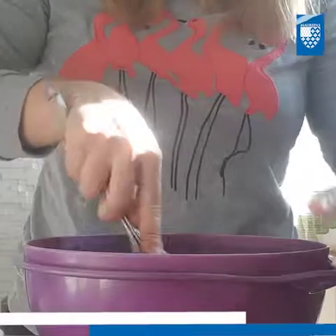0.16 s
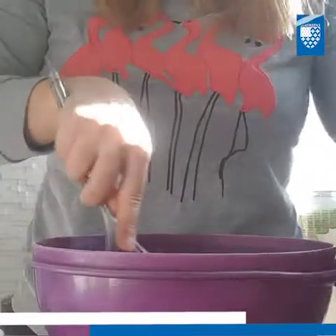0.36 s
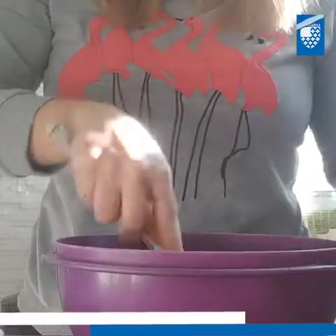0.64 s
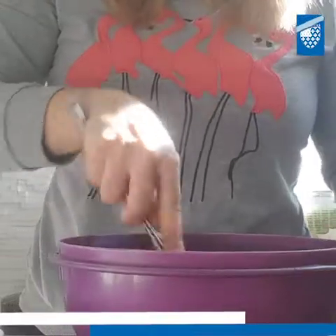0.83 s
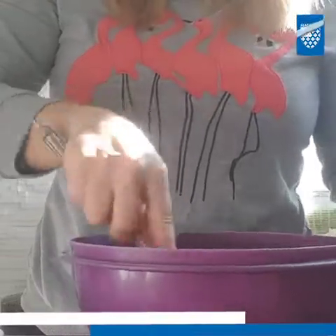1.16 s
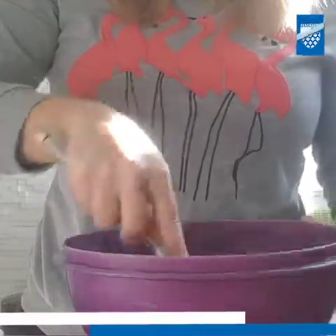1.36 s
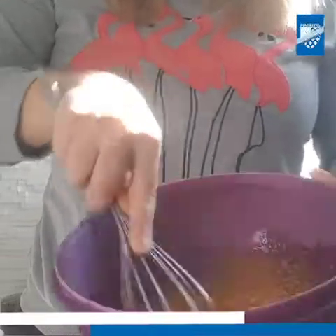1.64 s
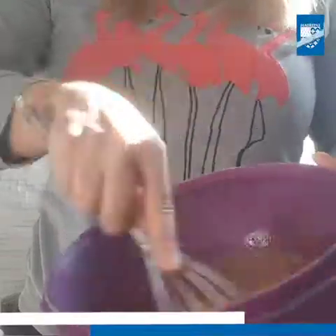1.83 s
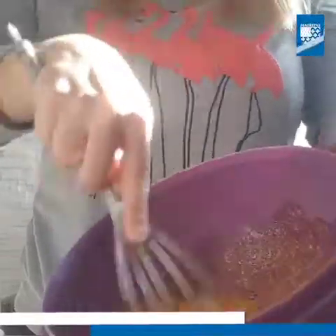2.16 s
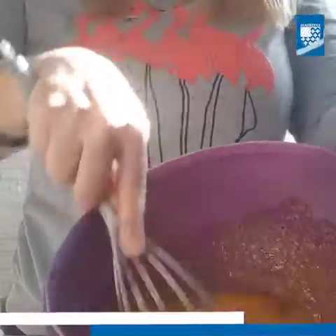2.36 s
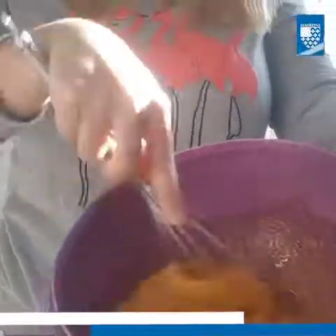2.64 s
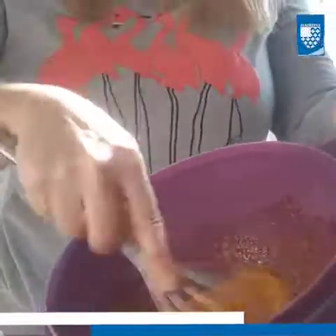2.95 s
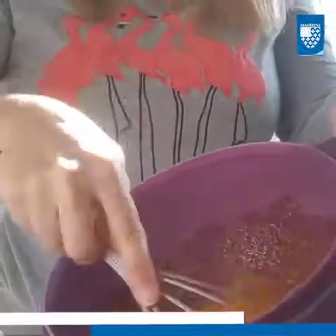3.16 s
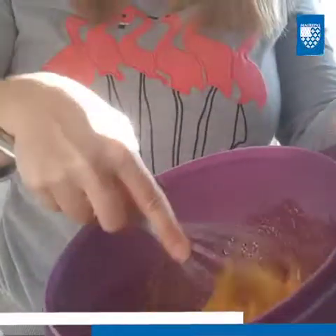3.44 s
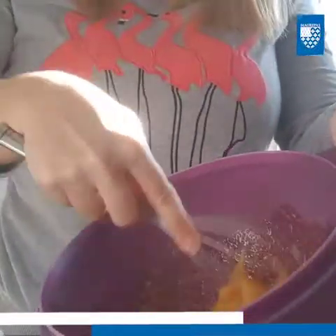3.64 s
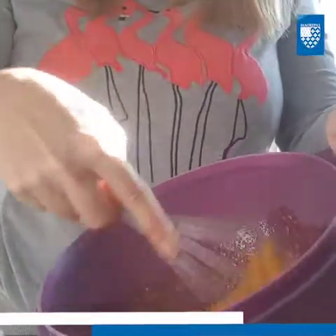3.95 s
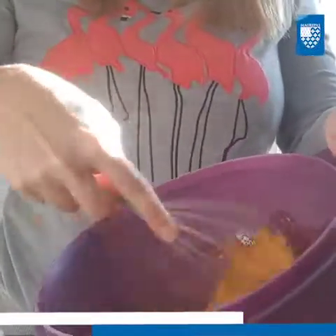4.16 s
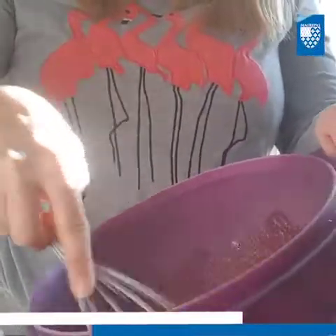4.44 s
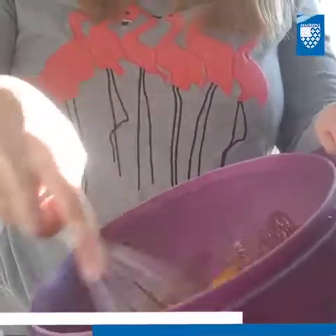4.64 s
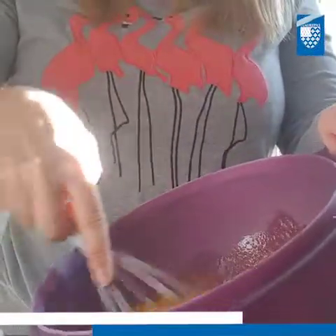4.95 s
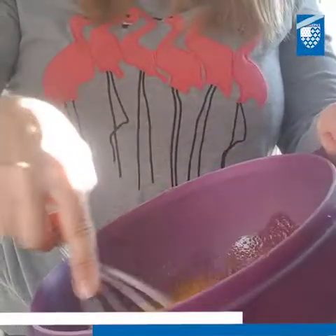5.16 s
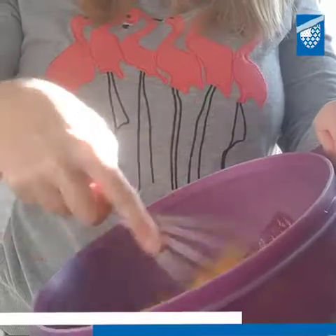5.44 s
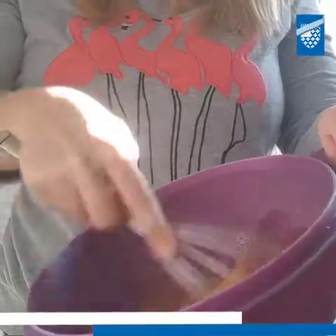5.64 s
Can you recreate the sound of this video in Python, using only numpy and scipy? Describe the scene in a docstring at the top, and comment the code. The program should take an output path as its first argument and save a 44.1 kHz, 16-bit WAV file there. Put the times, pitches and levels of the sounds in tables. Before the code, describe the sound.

Close up, a wire whisk works beaten egg in a plastic bowl in a quiet kitchen. Light, uneven strokes tick and scrape; around one second the bowl gets a dull bump with a brief wire twang. After three seconds the beating turns harder and regular, about four and a half strokes a second, with hollow clacks, wet slaps and frothy crackle. Short room reflections.

```python
"""A wire whisk beats eggs in a plastic bowl, about four and a half strokes a second, in a kitchen.
Each stroke is two bursts of wire ticks, a clatter on the wall and a scrape through the film, coloured by the bowl.
Slapped air pockets are damped gliding tones; froth is short rings set off by the whisk's power.
Bright rasps sound on bare plastic. The bowl thuds once near 1 s; about two seconds later the beating grows harder.
Filtered noise makes the rumble of the flexing bowl and the quiet room; sparse reflections make the reverberation."""
import sys
import numpy as np
from scipy import signal
from scipy.fft import rfft, irfft
from scipy.io import wavfile
from scipy.ndimage import uniform_filter1d

SR = 44100
rng = np.random.default_rng(int(sys.argv[2]) if len(sys.argv) > 2 else 0)


def materialize(psi):
    """Save the field psi as 16-bit PCM at rate SR to the path in sys.argv[1].

    A 1-D psi becomes a single channel; in a 2-D psi each row is a channel.
    """
    bounded = np.clip(np.atleast_2d(psi).T, -1, 1)
    quanta = np.round(bounded * 32767).astype(np.int16)
    wavfile.write(sys.argv[1], SR, quanta)


N = 255777

# Quiet room noise: (frequency [Hz], relative level [dB])
QUIET_SPECTRUM = [(25, -65), (55, -65), (200, -36.5), (2000, -45.5), (8000, -60.5)]
# Kitchen reverberation: (frequency [Hz], t60 [s])
KITCHEN_DECAY = [(100, 0.13), (2000, 0.36), (15000, 0.29)]
# Balance of the two microphone ports: (frequency [Hz], left minus right [dB])
PORT_BALANCE = [(120, -1), (450, 2), (1500, -2.5), (4500, 1.5), (9000, 0.5), (13000, -5.5)]
# Rumble of the flexing plastic: (frequency [Hz], relative level [dB])
FLEX_SPECTRUM = [(28, 0), (54, 6.5), (160, -2.5), (210, -21), (600, -32.5)]
# Nominal resonances of the bowl with the whisk in it: (frequency [Hz], width [Hz], lift [dB])
BOWL_RESONANCES = [(332, 117, 12), (562, 108, 10.5), (703, 102, 8.5), (1116, 46, 12.5), (1247.4, 49, 11.5),
                   (1646, 345, 6), (2200, 23, 0.5)]
# Modes of the whole bowl when bumped: (frequency [Hz], relative level [dB], t60 [s])
BODY_MODES = [(159, -4.5, 0.051), (309, 0, 0.1), (465, -12, 0.075), (669, -6.5, 0.17)]
# Crack of the bump: (frequency [Hz], relative level [dB])
CRACK_SPECTRUM = [(700, -2), (4500, -5.5), (9000, -28)]
# Shudder of the bowl after the bump: (frequency [Hz], relative level [dB])
SHUDDER_SPECTRUM = [(60, -1), (165, 27), (260, 2), (800, -5), (1300, -20), (5000, -35)]
# Air pockets slapped into the egg: (time [s], level [dB], starting pitch [Hz])
AIR_POCKETS = [ (1.052, -9.5, 672), (1.869, -31, 605), (2.101, -29.5, 613), (2.208, -18, 544),
               (3.428, -11, 507), (3.593, -14.5, 573), (4.038, -9.5, 578), (4.151, -24.5, 650),
               (4.225, -6, 596), (4.267, -13, 561), (4.453, -14, 590), (4.506, -18, 635),
               (4.761, -24.5, 634), (4.89, -20, 660), (4.914, -19, 603), (5.607, -14, 530)]
# Wires on bare plastic: (time of hardest pressure [s], relative level [dB], half length [s], treble [dB])
BARE_RASPS = [ (.532, -39.5, 0.0088, -5), (.927, -26.5, 0.032, -3.5), (1.296, -28.5, 0.012, -4),
              (1.355, -32, 0.04, 0.5), (2.54, -21, 0.0089, 5.5), (4.703, -25.5, 0.018, 4),
              (5.008, -24, 0.018, -2.5), (5.686, -22.5, 0.017, -6.5)]
# Rasp on bare plastic: (frequency [Hz], relative level [dB])
RASP_SPECTRUM = [(300, -12), (900, -9), (1800, 4.5), (7000, 3), (14000, -7.5)]
# Scrape through the wet film: (frequency [Hz], relative level [dB])
SCRAPE_SPECTRUM = [(220, -2.5), (500, 0), (900, -3.5), (1700, 3.5), (3800, 3), (7000, -2), (9000, -8.5),
                   (14000, -9)]
# Wires striking the wall: (frequency [Hz], relative level [dB])
STRIKE_SPECTRUM = [(150, -2), (220, -15), (480, -4.5), (950, -2.5), (1400, -5), (1950, 2.5), (2600, -3),
                   (9000, -18.5), (12000, -15.5), (16000, -21)]
# Single wires snapping on the wall: (time [s], relative level [dB], treble [dB])
WIRE_SNAPS = [ (0.122, -21, 11), (0.379, -18.5, 4.5), (.619, -22.5, 4), (1.981, -17, 5.5),
              (1.999, -23, 3.5), (2.081, -28, 5), (2.633, -29, 9), (2.913, -30.5, 5), (2.959, -23.5, 8.5),
              (3.191, -21, 7), (3.361, -18, 6.5), (3.397, -22, -18), (3.428, -20.5, 11),
              (3.565, -13.5, 10.5), (3.591, -17, -6), (3.801, -19.5, -10), (4.022, -13, -9),
              (4.037, -21, 21), (4.247, -18, 15), (4.48, -23.5, 3), (4.931, -21.5, 5.5), (4.955, -19, 12.5),
              (5.186, -18, 20), (5.36, -20, 6), (5.579, -19, -24), (5.603, -13, 8.5), (5.666, -17.5, 2),
              (5.794, -13, -3)]
# Whisk strokes, brighter where less egg coats the wall: (landing time [s], landing level [dB],
# sweep level [dB], landing to hardest pressure [s], landing treble [dB]); levels are relative
WHISK_STROKES = [ (0, -53, -61, 0.041, 8.5), (0.1, -42.5, -33.5, 0.04, 10), (.202, -37.5, -39.5, 0.04, 5.5),
                 (.347, -35.5, -36.5, 0.099, -2), (.555, -30, -33, 0.063, -5), (0.671, -42, -42, 0.069, 8),
                 (.812, -39.5, -37.5, 0.048, 6), (1.138, -34, -36, 0.12, 8.5),
                 (1.453, -38, -41, 0.064, -3.5), (1.628, -56, -68, 0.05, 15),
                 (1.726, -30, -45.5, 0.072, 1.5), (1.951, -30.5, -42, 0.083, 0.5),
                 (2.199, -29.5, -59, 0.083, 3), (2.395, -38, -36, 0.05, 0.5), (2.504, -36.5, -50, 0.06, 9),
                 (2.633, -32, -36, 0.074, 5), (2.833, -31.5, -31, 0.043, 6.5), (2.941, -35, -39, 0.092, 13),
                 (3.138, -10, -31, 0.079, 8), (3.343, -26.5, -28.5, 0.072, 11.5),
                 (3.547, -8.5, -28, 0.1, 10.5), (3.759, -22, -27.5, .075, 6.5), (3.986, -5, -30, 0.074, 9),
                 (4.199, -34.5, -30, 0.083, 13.5), (4.43, -28.5, -28.5, 0.087, 12.5),
                 (4.651, -31.5, -28.5, 0.1, 4.5), (4.878, -33, -31, 0.1, 15),
                 (5.101, -28, -27.5, 0.074, 11), (5.325, -30.5, -30, 0.077, 14),
                 (5.552, -28.5, -28, 0.08, 17), (5.783, -22, -35, 0.054, 15.5)]

TWANG_S, THUD_S, THUD_DB = 1.0225, 1.0525, -13.5
USUAL_LANDING_DB, USUAL_PEAK_S = -28, 0.075
LANDING_FADE_S, SNAP_FADE_S, FADE_POWER = 0.026, 0.0059, 1.5
FADE_HALVES_DB, BARE_HALVES_DB = 26.5, 22  # extra level or treble that halves a landing's fade
RISE_S, RISE_DOUBLES_DB = 0.0015, 9.5  # harder landings are given a slower rise
SWEEP_HALF_S, SWEEP_STRETCH_POWER = 0.036, 0.98  # slower strokes sweep for longer
SWEEP_TREBLE_DB, SWEEP_TREBLE_SHARE = -3, 0.57  # offset, and share of the stroke's treble
TAPS = 4096
HZ = np.fft.rfftfreq(TAPS, 1 / SR)


def gain_of(db):
    """Decibels to amplitude gain."""
    return 10 ** (np.asarray(db) / 20)


def evened(x):
    """Scales to an rms of one."""
    return x / np.sqrt(np.mean(x ** 2) + 1e-20)


def read(points, hz):
    """Interpolates (frequency [Hz], value) points on a log-frequency axis."""
    point_hz, value = np.transpose(points)
    return np.interp(np.log(hz + 1), np.log(point_hz + 1), value)


def add(mix, time_s, sound):
    """Mixes a sound in at a time, trimmed to the mix."""
    start = round(time_s * SR)
    sound = sound[..., max(-start, 0):]
    part = mix[:, max(start, 0):][:, :sound.shape[-1]]
    part += sound[..., :part.shape[1]]


def colour(x, db):
    """Minimum-phase filter with gain db over HZ: resonances ring after a click, never before."""
    both_sides_db = np.r_[db, db[-2:0:-1]]
    phase = -signal.hilbert(np.log(gain_of(both_sides_db))).imag[:len(db)]
    impulse = irfft(gain_of(db) * np.exp(1j * phase))
    return signal.fftconvolve(x, impulse[None], axes=1)


def bump(centre_hz, width_hz):
    """Resonance peak of height one over HZ."""
    return 1 / (1 + (2 * (HZ - centre_hz) / width_hz) ** 2)


def treble(corner_hz=3000):
    """Smooth step from zero to one over HZ."""
    return 1 - 1 / (1 + np.square(HZ / corner_hz) ** 2)


def effort(x, settle_s):
    """Power of a sound, dying away exponentially after each blow."""
    r = np.exp(-1 / (settle_s * SR))
    return signal.lfilter([1 - r], [1, -r], (x ** 2).mean(0)) + 1e-12


def noise(spectrum, alike, swell=1):
    """Coloured noise of rms one; alike is the power share common to both channels."""
    shared, alike = rng.standard_normal(N), np.clip(alike, 0, 1)
    own = rng.standard_normal((2, N))
    x = swell * (np.sqrt(alike) * shared + np.sqrt(1 - alike) * own)
    gain = gain_of(read(spectrum, np.fft.rfftfreq(2 * N, 1 / SR)))
    return evened(irfft(rfft(x, 2 * N) * gain)[:, :N])


def ticks(size, per_s, spread_db, lag_s=0.00011, scatter_s=0.00008):
    """Tiny wire contacts of uneven force, each with its own place and so its own left-right lag."""
    force = (rng.random(size) < per_s / SR) * rng.choice([-1, 1], size)
    force = force * gain_of(spread_db * np.minimum(rng.exponential(1, size), np.pi))
    lag = np.round((lag_s + scatter_s * rng.standard_normal(size)) * SR).astype(int)
    left = np.bincount((np.arange(size) + lag) % size, force, size)
    return evened(np.array([left, force]))


def through_bowl(drive, spectrum, extra_db, pressure, place_db=0, grain_hz=300, detune=0.027):
    """The bowl radiates a contact: place and sloshing load set its colour, pressure its energy."""
    load = 1 + detune * rng.standard_normal()
    rings_db = sum(bump(hz * load, width_hz) * lift_db for hz, width_hz, lift_db in BOWL_RESONANCES)
    grain = bump(SR / 4, grain_hz) ** 2
    place = evened(signal.fftconvolve(rng.standard_normal(len(HZ)), grain, "same"))
    x = colour(drive, read(spectrum, HZ) + rings_db + extra_db + place_db * place)
    return x * np.sqrt(2 * np.sum(pressure ** 2) / (np.sum(x ** 2) + 1e-20))


def quiet_room(level_db=-60):
    """Steady room noise, mostly shared by the channels."""
    return gain_of(level_db) * noise(QUIET_SPECTRUM, alike=0.78)


def kitchen(x, first_s=0.0005, build_s=0.017):
    """Sparse reflections from walls and cupboards, each band dying at its own speed."""
    taps = rng.choice([-1., 1.], (2, SR // 2)) * (rng.random((2, SR // 2)) < 4000 / SR)
    hz, t, bands = signal.stft(taps, SR, nperseg=256)
    decay_db = -60 * t / read(KITCHEN_DECAY, hz)[:, None]
    tail = signal.istft(bands * gain_of(decay_db), SR, nperseg=256)[1]
    tail = tail * np.clip((np.arange(tail.shape[1]) / SR - first_s) / build_s, 0, 1)
    return signal.fftconvolve(x, tail / np.linalg.norm(tail[0]), axes=1)[:, :N]


def wobble(blows, level_db=-41, follow_power=0.24, settle_s=0.011):
    """The soft plastic flexes under each blow and rumbles until it settles."""
    swell = effort(blows, settle_s) ** follow_power
    return gain_of(level_db) * noise(FLEX_SPECTRUM, alike=0.79, swell=swell)


def thud(twang_hz=1590, twang_db=-23, twang_fade_s=0.021, crack_db=-10, crack_s=0.01,
         shudder_db=-20, shudder_s=0.033):
    """A wire catches with a short twang, then a bump cracks on the bowl; it rings and shudders."""
    out, t = np.zeros((2, N)), np.arange(SR // 2) / SR
    grip = signal.fftconvolve(rng.standard_normal(len(t)), np.hanning(SR // 200), "same")
    slips = evened(grip) * np.exp(-t / twang_fade_s) * (1 - np.exp(-t / RISE_S))
    add(out, TWANG_S, gain_of(twang_db) * slips * np.sin(2 * np.pi * twang_hz * t))
    for hz, db, t60_s in BODY_MODES:
        add(out, THUD_S, gain_of(THUD_DB + db - 60 * t / t60_s) * np.sin(2 * np.pi * hz * t))
    bursts = (crack_db, crack_s, CRACK_SPECTRUM), (shudder_db, shudder_s, SHUDDER_SPECTRUM)
    for db, fade_s, spectrum in bursts:
        settle = np.exp(-t / fade_s)
        drive = settle * ticks(len(t), per_s=2600, spread_db=0.5)
        add(out, THUD_S, gain_of(db) * through_bowl(drive, spectrum, 0, settle))
    return out


def drips(count=36, level_db=-45, low_hz=500, high_hz=820):
    """Egg falls back in faint blips: (time [s], level [dB], starting pitch [Hz])."""
    return [(when * N / SR, level_db, low_hz + (high_hz - low_hz) * size)
            for when, size in rng.random((count, 2))]


def plops(glide=0.064, cycles=3.26, rise_s=0.00039, ring_hz=562, ring_db=-26, ring_s=0.077,
          overtone_ratio=1.82, overtone_db=-11):
    """A lopsided air pocket throbs in two modes for a few cycles; the bowl rings on faintly."""
    out, t = np.zeros((2, N)), np.arange(SR // 6) / SR
    ring = gain_of(ring_db) * np.exp(-t / ring_s) * np.sin(2 * np.pi * ring_hz * t)
    for time_s, db, hz in AIR_POCKETS + drips():
        age = t * hz / cycles
        angle = 2 * np.pi * hz * t * (1 + glide * age)  # pitch rises as the pocket closes
        modes = np.sin(angle) + gain_of(overtone_db) * np.sin(overtone_ratio * angle)
        throb = np.exp(-age ** 2) * modes
        add(out, time_s, gain_of(db) * (1 - np.exp(-t / rise_s)) * (throb + ring))
    return out


def froth(whisk, level_db=-9.0, per_s=45, spread_db=8, cycles=5, low_hz=480, high_hz=3300, tilt_power=0.19):
    """Wires tear small bubbles open; the thick egg damps each within a few cycles."""
    out, t = np.zeros((2, N)), np.arange(SR // 20) / SR
    stir = np.sqrt(effort(whisk, settle_s=0.0013))
    for hz in np.geomspace(low_hz, high_hz, 20):
        age = t * hz / cycles
        ring = age * np.exp(-2 * age) * np.sin(2 * np.pi * hz * t)
        bursts = stir * ticks(N, per_s, spread_db)
        bubbles = signal.oaconvolve(bursts, ring[None], axes=1)[:, :N]
        out += (hz / low_hz) ** tilt_power * bubbles
    return gain_of(level_db) * whisk.std() * evened(out)


def splashing(x, patch_db=3, patch_hz=520, patch_s=0.021):
    """The egg film tears and closes, so patches of the spectrum flare up and vanish."""
    hz, t, bands = signal.stft(x, SR, nperseg=256, noverlap=192)
    patches = rng.standard_normal((len(t), len(hz))).T
    for axis, cells in enumerate([patch_hz / hz[1], patch_s / t[1]]):
        patches = uniform_filter1d(patches, max(round(cells), 1), axis)
    flare = evened(gain_of(patch_db * evened(patches)))
    return signal.istft(bands * flare, SR, nperseg=256, noverlap=192)[1][:, :N]


def sweeps():
    """Drags after landing: (time of hardest pressure [s], level [dB], half length [s], treble [dB])."""
    rows = []
    for time_s, _, db, peak_s, treble_db in WHISK_STROKES:
        half_s = SWEEP_HALF_S * (peak_s / USUAL_PEAK_S) ** SWEEP_STRETCH_POWER
        rows.append((time_s + peak_s, db, half_s, SWEEP_TREBLE_DB + SWEEP_TREBLE_SHARE * treble_db))
    return rows


def scrapes(rows, spectrum, hollow_hz=2100, climb_octaves=0.13, hollow_width_hz=340, hollow_db=5,
            level_db=1.0, judder_db=1, judder_s=0.0032, release=1.274, squareness=2.31, hollow_growth_db=3):
    """Dense crackle swells and fades; the hollow behind the wires grows and rises in pitch."""
    out, t = np.zeros((2, N)), np.arange(-SR // 7, SR // 7) / SR
    r = np.exp(-np.pi * hollow_width_hz / SR)
    for time_s, db, half_s, treble_db in rows:
        travel = t / half_s
        # the wires lift faster than they bear down
        pressure = np.exp(-np.where(travel > 0, release * travel, -travel) ** squareness / 2)
        # wire after wire catches and lets go
        catches = uniform_filter1d(rng.standard_normal(len(t)), max(int(judder_s * SR), 1))
        drive = pressure * gain_of(judder_db * evened(catches)) * ticks(len(t), per_s=9000, spread_db=2.5)
        # gliding resonance: shift down to 0 Hz, low-pass, shift back up
        glide_hz = hollow_hz * 2 ** (climb_octaves * np.clip(travel, -2, 2))
        turn = np.exp(2j * np.pi * np.cumsum(glide_hz) / SR)
        hollow = 2 * (turn * signal.lfilter([1 - r], [1, -r], drive / turn)).real
        hollow = hollow * gain_of(hollow_growth_db * np.clip(travel, -2, 2))
        mixed = drive + gain_of(hollow_db) * hollow
        sound = through_bowl(mixed, spectrum, treble_db * treble(), pressure, place_db=1.73)
        add(out, time_s + t[0], gain_of(db + level_db) * sound)
    return out


def wire_hits():
    """Snaps and stroke landings: (time [s], level [dB], rise [s], fade [s], treble [dB])."""
    hits = [(time_s, db, RISE_S, SNAP_FADE_S, treble_db) for time_s, db, treble_db in WIRE_SNAPS]
    for time_s, db, _, _, treble_db in WHISK_STROKES:
        harder_db = db - USUAL_LANDING_DB
        halvings = harder_db / FADE_HALVES_DB + treble_db / BARE_HALVES_DB
        rise_s = RISE_S * 2 ** (max(harder_db, 0) / RISE_DOUBLES_DB)
        hits.append((time_s, db, rise_s, LANDING_FADE_S / 2 ** halvings, treble_db))
    return hits


def clatters(level_db=4.0, clack_hz=2080, clack_width_hz=560, clack_db=12.5, hard_db=-19):
    """Wire loops land and chatter to rest; hard blows get through the egg and clack on bare plastic."""
    out, t = np.zeros((2, N)), np.arange(SR // 5) / SR
    for time_s, db, rise_s, fade_s, treble_db in wire_hits():
        pressure = (1 - np.exp(-t / rise_s)) * np.exp(-(t / fade_s) ** FADE_POWER)
        drive = pressure * ticks(len(t), per_s=3600, spread_db=2.5)
        bare = 1 / (1 + gain_of(hard_db - db) ** 2)
        extra_db = treble_db * treble() + clack_db * bare * bump(clack_hz, clack_width_hz)
        sound = through_bowl(drive, STRIKE_SPECTRUM, extra_db, pressure, place_db=2.5)
        add(out, time_s, gain_of(db + level_db) * sound)
    return out


def scene(room_db=-12, egg_room_db=-11, drag=0.57):
    """Whisk, egg and bowl in a quiet kitchen."""
    strikes, rubs = clatters(), scrapes(sweeps(), SCRAPE_SPECTRUM)
    slaps, knock = plops(), thud()
    film = splashing(rubs + scrapes(BARE_RASPS, RASP_SPECTRUM))
    whisk = strikes + film + froth(rubs + 0.5 * (strikes + slaps))
    room = kitchen(gain_of(room_db) * whisk + gain_of(egg_room_db) * (slaps + knock))
    rumble = wobble(strikes + slaps + drag * (rubs + knock))
    return whisk + slaps + knock + rumble + room + quiet_room()


def record(dry, low_cut_hz=44, band_limit_hz=15950):
    """Two microphone ports of unlike colour, a bass cut and a band limit."""
    balance_db = read(PORT_BALANCE, np.fft.rfftfreq(2 * N, 1 / SR))
    ports = irfft(rfft(dry, 2 * N) * gain_of(np.outer([0.5, -0.5], balance_db)))[:, :N]
    ports = signal.sosfilt(signal.butter(6, low_cut_hz, "high", fs=SR, output="sos"), ports)
    low_pass = signal.firwin(511, band_limit_hz, window=("kaiser", 9), fs=SR)
    return signal.oaconvolve(ports, low_pass[None], "same")


dry = scene()
out = record(dry)
materialize(out)
```